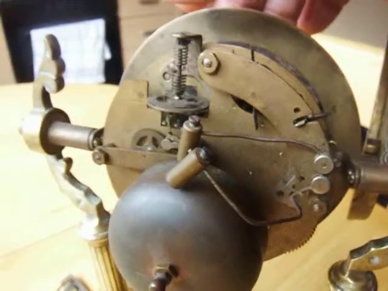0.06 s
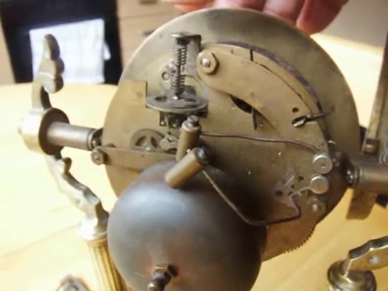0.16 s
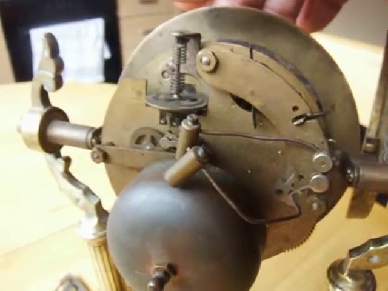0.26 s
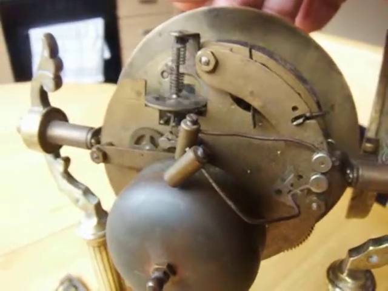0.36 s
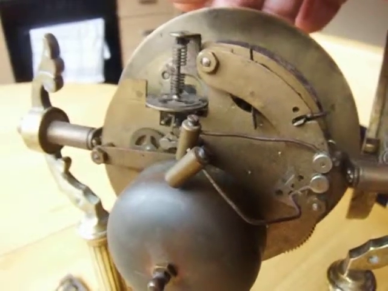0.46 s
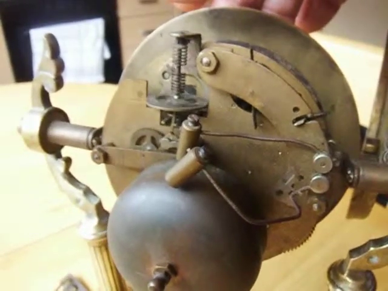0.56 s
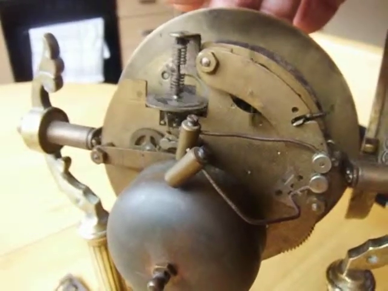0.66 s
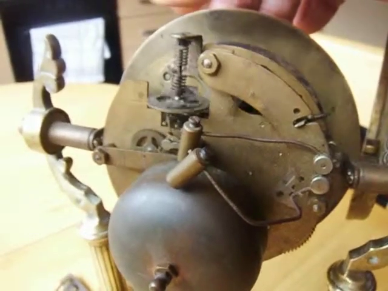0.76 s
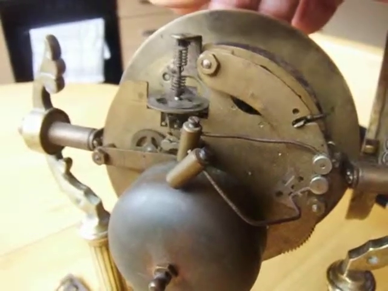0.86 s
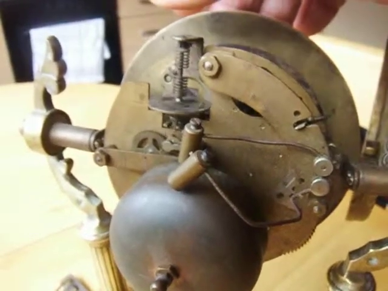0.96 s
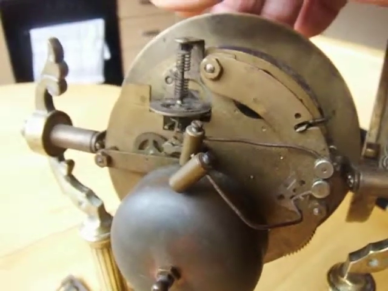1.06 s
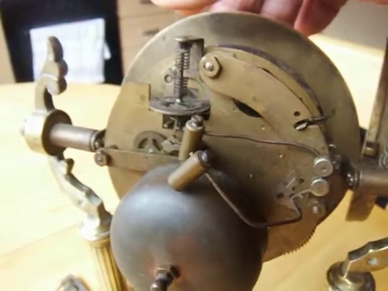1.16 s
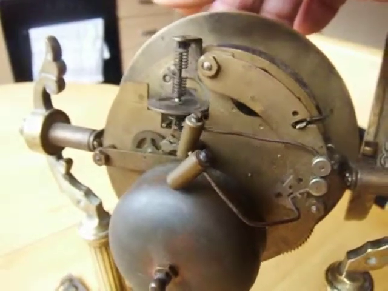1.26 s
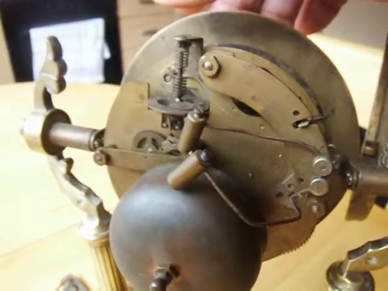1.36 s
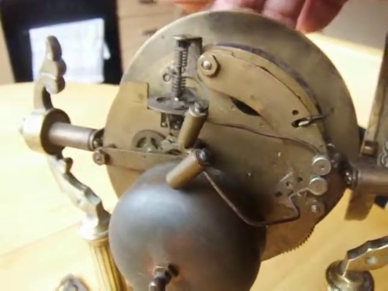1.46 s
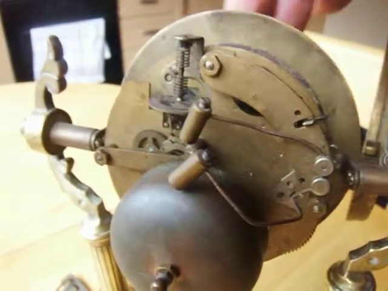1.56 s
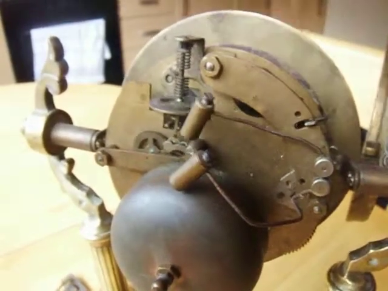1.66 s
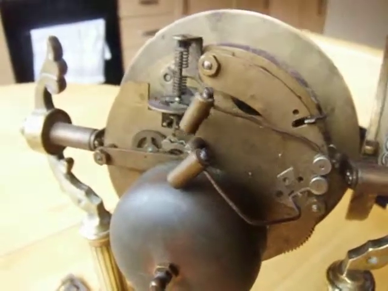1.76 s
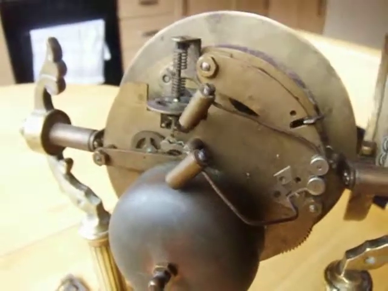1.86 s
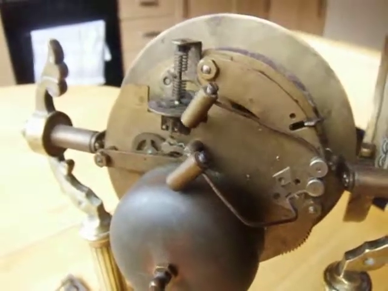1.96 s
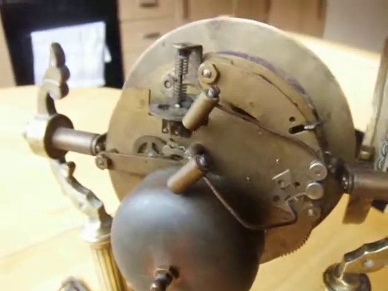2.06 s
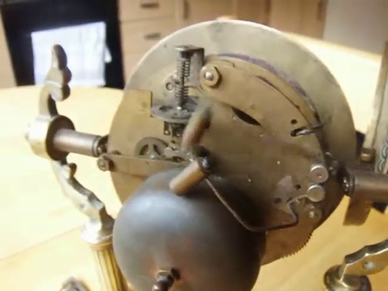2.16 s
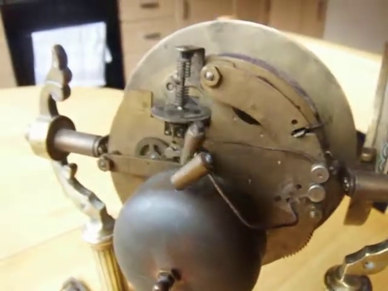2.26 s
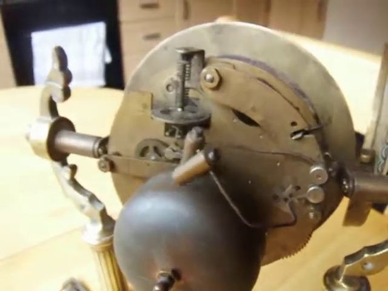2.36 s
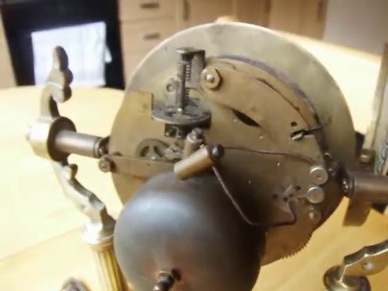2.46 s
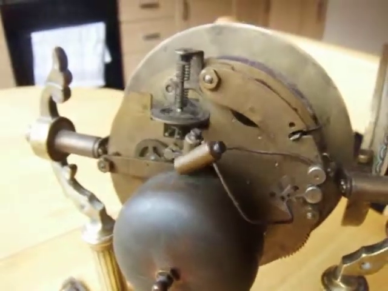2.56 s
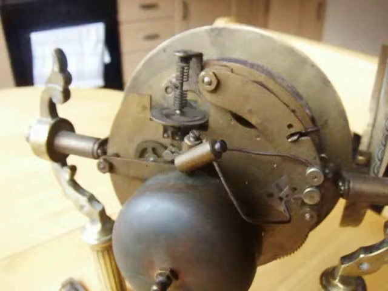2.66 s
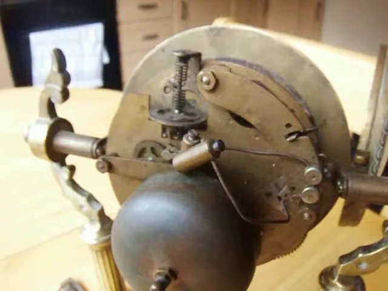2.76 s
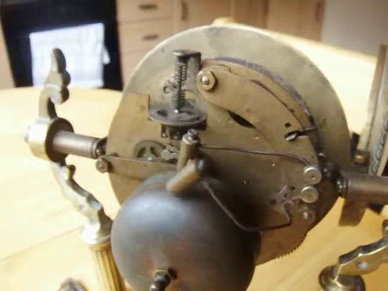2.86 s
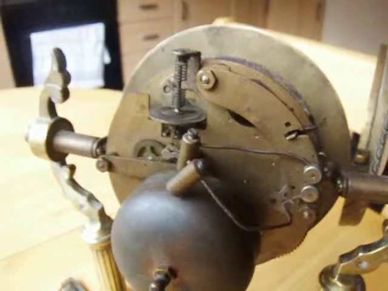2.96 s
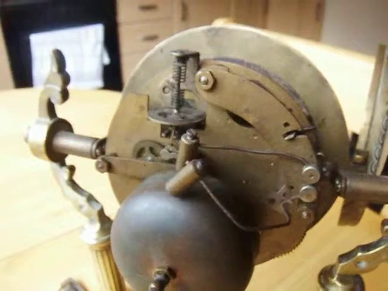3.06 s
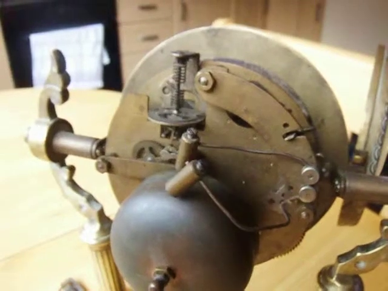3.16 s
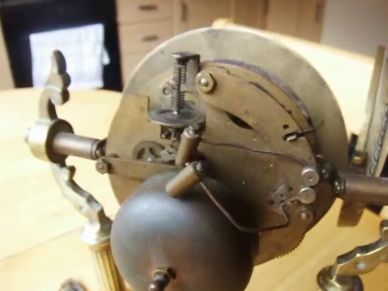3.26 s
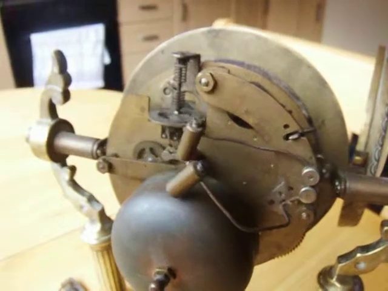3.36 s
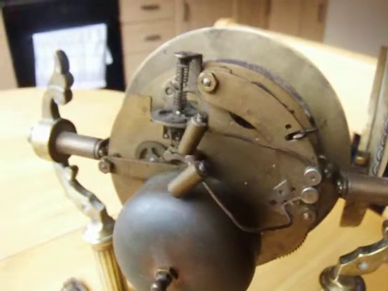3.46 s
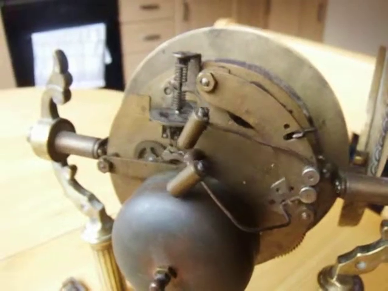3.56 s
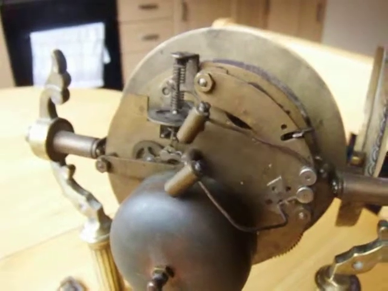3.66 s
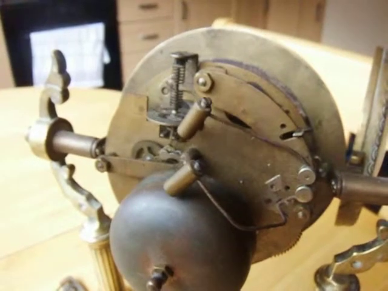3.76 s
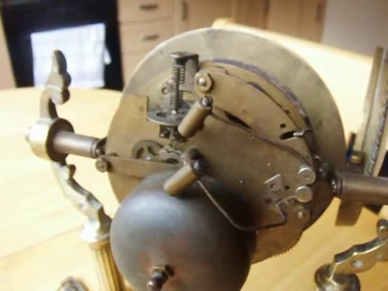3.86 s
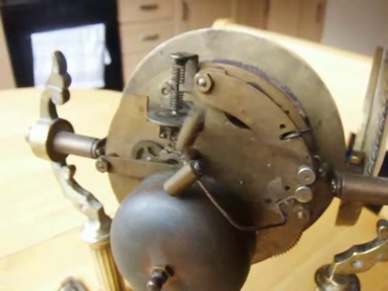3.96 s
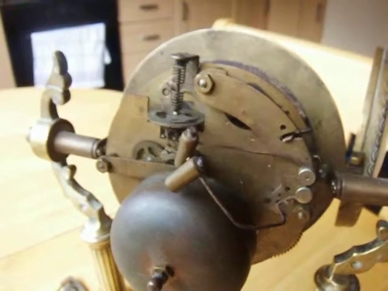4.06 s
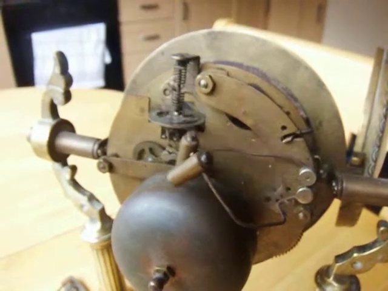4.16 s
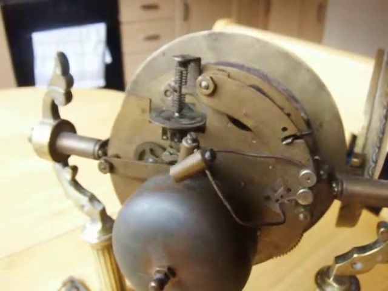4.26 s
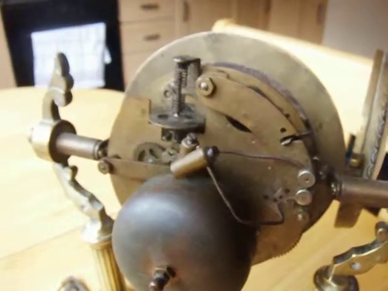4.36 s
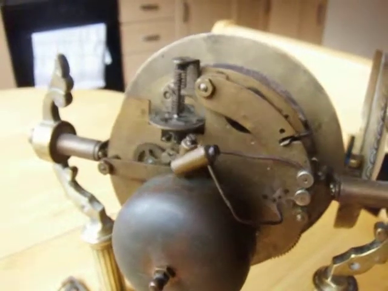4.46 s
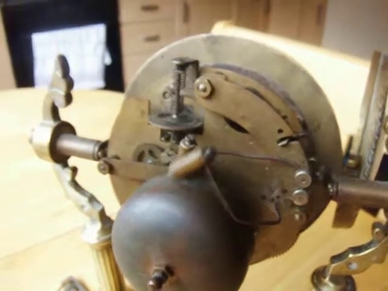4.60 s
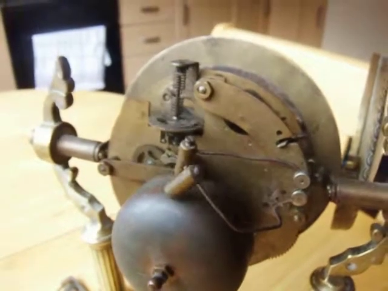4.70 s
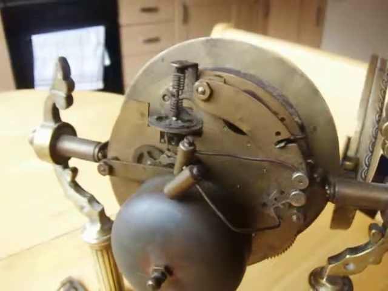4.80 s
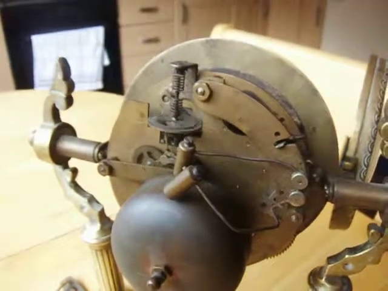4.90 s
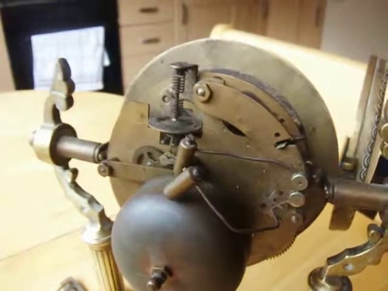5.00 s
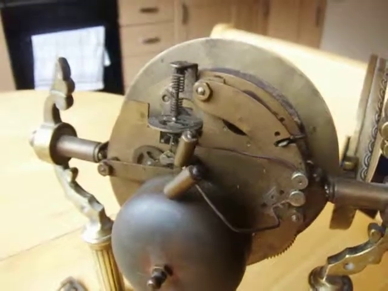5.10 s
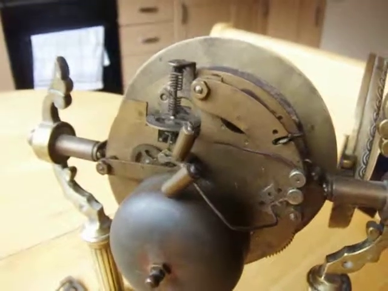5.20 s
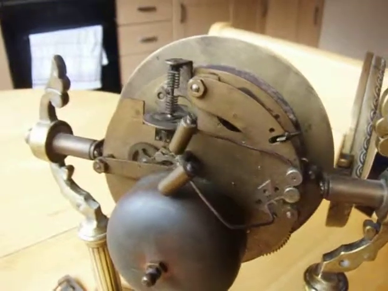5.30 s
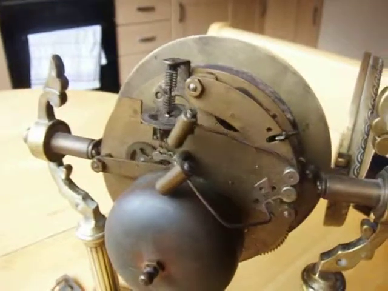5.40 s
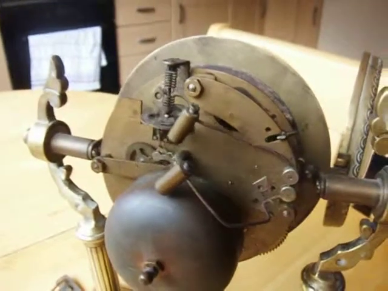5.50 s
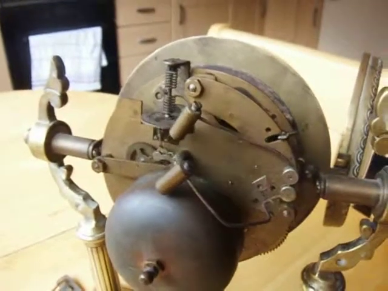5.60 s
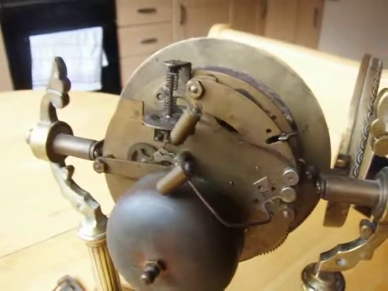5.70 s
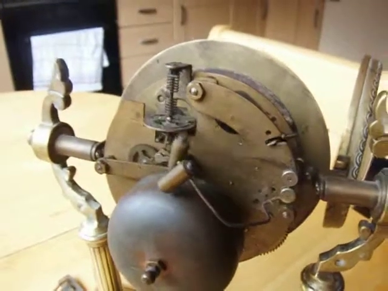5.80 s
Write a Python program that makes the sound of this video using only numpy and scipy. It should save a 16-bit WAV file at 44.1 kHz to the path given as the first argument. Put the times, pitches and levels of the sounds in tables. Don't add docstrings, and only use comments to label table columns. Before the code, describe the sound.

A small, lo-fi microphone sits close to a clock movement on an indoor table. At first there is soft low air murmur, faint hum and handling rumble. A light click comes at 0.3 s, then a loud metallic lever clack at 0.68 s with quick dwindling bounces. At 0.93 s the wheels start, sharp ticks quickening over about a second into a dry rattle of roughly 45 teeth per second, continuing to the end near 5.8 s. Heavy bell strokes land at 2.2, 4.0 and 5.76 s: a hard crack, table thud, fluttering hammer rebounds and a piercing ring near 4.2 kHz over softer tones around 1.6 kHz. Lighter, drier strokes on the smaller bell fall at 2.85 and 4.65 s, slightly higher. Rings overlap and beat. A small catch clicks at 3.39 s. Blows clip, the level steps down, then returns half a second later; treble is muffled and grainy.

```python
import sys
import numpy as np
from scipy import signal
from scipy.fft import rfft, irfft
from scipy.io import wavfile

SR = 44100
rng = np.random.default_rng(int(sys.argv[2]) if len(sys.argv) > 2 else 0)


def makeup_ratio(level_db):
    decades = np.asarray(level_db, float) / 20
    return 10 ** decades


def unload_audio(sound):
    columns = np.transpose(np.atleast_2d(sound))
    steps = np.round(np.clip(columns, -1, 1) * 32767)
    wavfile.write(sys.argv[1], SR, steps.astype(np.int16))


N = 257544
T = np.arange(N) / SR

OUTER_S, INNER_S = [2.20362, 4.00317, 5.76376], [2.84857, 4.64643]
# (low partials [dB], high partials [dB], knock [dB], extra for the last split twin [dB])
OUTER_BLOWS = [
    (3.5, 3, 7.4, 0),
    (5.5, 3.5, 14, 0),
    (8, 5.5, 12, 0),
]
START_S, TOP_PER_S = .93, 45.397


def evened(x):
    return x / np.sqrt(np.mean(x ** 2) + 1e-20)


def add(mix, s, sound):
    part = mix[round(s * SR):][:len(sound)]
    part += sound[:len(part)]


def curve(rows):
    return np.interp(T, *np.transpose(rows))


def since(s):
    return np.maximum(T - s, 0)


def shaped(points):
    f, db = np.transpose(points)
    hz = np.fft.rfftfreq(N, 1 / SR)
    spectrum_db = np.interp(np.log(hz + 1), np.log(f + 1), db)
    return evened(irfft(rfft(rng.standard_normal(N)) * makeup_ratio(spectrum_db), N))


def ring(modes, scatter_db, rise, crack_db, crack_t60):
    t = T[:8000]
    hz, db, t60 = np.transpose(modes)[:, :, None]
    level_luck, phase_luck = rng.standard_normal((2, len(modes), 1))
    decay = makeup_ratio(db + scatter_db * level_luck - 60 * t / t60)
    sound = (decay * np.sin(2 * np.pi * hz * t + phase_luck)).sum(0)
    thin_noise = np.diff(rng.standard_normal(len(t) + 1)) * 2
    sound += makeup_ratio(crack_db - 60 * t / crack_t60) * thin_noise
    sound *= 1 - np.exp(-t / rise)
    return sound / abs(sound).max()


def gain():
    step_s = [0, 2.2065, 2.8505, 3.3555, 4.006, 4.5335, 4.6475, 5.157, 5.7665]
    # (gain [dB], creep [dB/s])
    steps = [(2, -1.54), (-2.37, 4), (-9.5, -5.5), (0, -1.25), (-10.5, -4), (-1.7, -5), (-10.5, -5),
             (-0.94, 1), (-13.5, 7)]
    step = np.searchsorted(step_s, T, "right") - 1
    gain_db, creep = np.transpose(steps)[:, step]
    return makeup_ratio(gain_db + creep * (T - np.take(step_s, step)))


def duck():
    deepest_s, settle_db = 0.29, -5
    dips = [-18, -9, -26]
    duck_db = settle_db * np.minimum(since(OUTER_S[0]) / 0.22, 1)
    for s, db in zip(OUTER_S, dips):
        lapse = since(s) / deepest_s
        duck_db = duck_db + db * (lapse * np.exp(1 - lapse)) ** 2
    return duck_db


def appliance_hum():
    # (frequency [Hz], level [dB])
    tones = [(120, -65.5), (387.6, -68.5), (506, -72.5), (807.5, -71)]
    hum = np.zeros(N)
    for hz, db in tones:
        waver = .4 * shaped([(.3, 2.5), (4, -15), (9, -60.0)])
        hum += makeup_ratio(db + 5.0) * np.sin(2 * np.pi * hz * T + waver)
    return hum


def hand(duck_db):
    push_db, push_duck, surge_s = -54, 1.1, 0.065
    # (time [s], level above the steady push [dB])
    surges = [(.24, 5), (.67, 7), (1.3, 3.5), (1.48, 11), (1.639, 6.5), (1.81, 12), (2.048, 5), (2.2, 13.5),
              (2.839, 6.5), (3.348, 13), (3.6, 6.5), (4.01, 11.5), (4.52, 9), (4.85, 10.5), (5.161, 11.5),
              (5.758, 15)]
    surge_db = sum(db * np.exp(-((T - s) / surge_s) ** 2) for s, db in surges)
    rumble = shaped([(3, -3.5), (10, -6.5), (25, -10.5), (55, -10.5), (90, -33.5), (200, -48.0)])
    return makeup_ratio(push_db + push_duck * duck_db + surge_db) * rumble


def room():
    murmur_db = -50.5
    # (frequency [Hz], density [dB per Hz])
    air = [(35, -32.5), (60, -4.5), (135, -0.5), (276, -6), (513, -5.5), (553, -9.5), (620, -9.5),
           (2400, -22), (3500, -21.5), (5400, -35.5), (7020, -65), (11900, -120)]
    duck_db = duck()
    murmur = makeup_ratio(0.5) * shaped(air) + makeup_ratio(48) * appliance_hum()
    return makeup_ratio(murmur_db + duck_db) * murmur + hand(duck_db)


def table():
    # (frequency [Hz], lag [turns], level under the knock [dB], t60 [s])
    boards = [(421, 0.056, -28, 0.1), (461, 0.42, -26, 0.11)]
    # (frequency [Hz], density [dB per Hz])
    loose_parts = [(90, -3), (280, 2), (600, -5), (950, -4), (1500, -7), (3000, -2.5), (5400, -15)]
    thud_db, thud_t60 = -24, 0.1
    out, t, jolt = np.zeros(N), T[:12000], shaped(loose_parts)
    for s, (_, _, knock_db, _) in zip(OUTER_S, OUTER_BLOWS):
        bloom = sum(makeup_ratio(db - 60 * t / t60) * np.sin(2 * np.pi * (hz * t + lag)) for hz, lag, db, t60 in boards)
        thud = makeup_ratio(thud_db - 60 * t / thud_t60) * np.roll(jolt, round(s * SR))[:len(t)]
        add(out, s, makeup_ratio(knock_db) * (bloom + thud) * (1 - np.exp(-t / .003)))
    return out


def speed():
    start_per_s, spin_up_s = 17.0, .7005
    return TOP_PER_S - (TOP_PER_S - start_per_s) * np.exp(-since(START_S) / spin_up_s)


def rattle(modes, level_db, calm, spread):
    # (time [s], slip [teeth])
    slip = [(1.85, 0), (2, .13), (2.15, -.15), (2.65, -.24), (3.15, .44), (3.4, .42), (3.9, .1),
            (4.4, -.07), (4.65, -.57), (4.9, -.55), (5.15, -.14), (5.83, .22)]
    start_teeth = -.31
    teeth = np.cumsum(speed() * (T > START_S)) / SR + start_teeth + curve(slip) + .5
    tooth_db = 1.6 * rng.standard_normal(300)[np.clip(teeth, 0, 299).astype(int)]
    crowd = calm + np.exp(-((teeth % 1 - .5) / spread) ** 2)
    sizes = rng.standard_normal(N) * makeup_ratio(2.5 * np.minimum(rng.exponential(1, N), 4))
    struck = rng.random(N) < 3000 * crowd / SR
    taps = struck * sizes * np.sqrt(crowd) * makeup_ratio(tooth_db) + 0j
    taps += 0.83 * np.diff(np.floor(teeth + .5), prepend=0) * sizes
    rung = np.zeros(N)
    for k, (hz, width, db) in enumerate(modes):
        pole = np.exp((2j * np.pi * hz - np.pi * width) / SR)
        rung += (-1) ** k * makeup_ratio(db) * signal.lfilter([1], [1, -pole], taps).imag
    return evened(rung) * makeup_ratio(level_db) * (T > START_S)


def running_train():
    # (frequency [Hz], width [Hz], level [dB])
    fly = [(3823, 350, -7), (4410, 370, -1), (4716, 400, -5), (5524, 350, -3)]
    # (frequency [Hz], width [Hz], level [dB])
    wheels = [(276.4, 16, -30), (2046, 500, -3.5), (2600, 340, -1.5), (2866, 320, -1), (3630, 400, -5)]
    # (time [s], level [dB])
    play = [(.93, -2.5), (1.7, 0), (1.94, 0.5), (2.15, -0.5), (2.45, 1.5), (2.7, -2), (3, 2), (3.4, -0.5),
            (3.55, -1.5), (4, 2), (4.5, 0.5), (4.65, 0.5), (4.9, 1.5), (5.1, 2.5), (5.25, 0), (5.84, 1.5)]
    fly_db, fly_per_speed = -43, .8
    wheels_db, wheels_per_speed = -47, 2
    hush_s, hush_length_s, hush_db = 1.84, .085, -7
    shake_db, shake_s = 4.5, 0.32
    speed_db = 20 * np.log10(speed() / TOP_PER_S)
    loose_db = curve(play) + hush_db * ((T > hush_s) & (T < hush_s + hush_length_s))
    shaking_db = sum(shake_db * np.exp(-since(s) / shake_s) * (T > s) for s in OUTER_S)
    fly_level_db = fly_db + fly_per_speed * speed_db + loose_db
    wheels_level_db = wheels_db + wheels_per_speed * speed_db + 1.8 * loose_db + shaking_db
    out = rattle(fly, fly_level_db, calm=0.13, spread=0.28)
    return out + rattle(wheels, wheels_level_db, calm=0.36, spread=0.41)


def tooth_snaps():
    # (time [s], peak level [dB])
    landings = [(.9414, -34.5), (.9951, -25), (1.0555, -33.5), (1.0999, -28), (1.1403, -30.5),
                (1.1745, -33), (1.2516, -36), (1.3324, -33.5), (1.4531, -30.5), (1.488, -30.5),
                (1.514, -30), (1.5733, -31.5), (1.6034, -35.5), (1.6648, -25.5), (1.737, -35.5),
                (1.773, -29), (1.929, -38), (2.0522, -35.5), (2.2694, -33.5), (2.4074, -38),
                (2.6653, -35.5), (2.6898, -25.5), (2.7112, -25.5), (3.3737, -40), (5.1847, -42)]
    # (frequency [Hz], level [dB], t60 [s])
    tick = [(2720, -10.5, 0.0089), (3743, -4.5, .008), (4090, -1.5, 0.014), (5040, -0.5, .008),
            (5780, -10, 0.013)]
    out = np.zeros(N)
    for s, db in landings:
        add(out, s, makeup_ratio(db + 11.0) * ring(tick, 2.9, 0.000041, 1, .006))
    return out


def hammer_hops():
    # (frequency [Hz], level [dB], t60 [s])
    snap = [(2230, -12.5, 0.019), (2754, -2.5, 0.019), (3520, -2, 0.014), (4570, 9, 0.002),
            (4980, -6.5, 0.024), (5110, -0.5, 0.018)]
    first_hops_s, first_hops_db = [.057, .0553, .056], [-24.5, -25, -26]
    shrink, hops, loss_db, scatter_db = .87, 8, 0.3, 0.5
    k = np.arange(hops)
    out = np.zeros(N)
    for blow_s, first_s, first_db in zip(OUTER_S, first_hops_s, first_hops_db):
        hop_s = blow_s + np.cumsum(first_s * shrink ** k)
        hop_db = first_db + scatter_db * rng.standard_normal(hops) - loss_db * k
        for s, db in zip(hop_s, hop_db):
            add(out, s, makeup_ratio(db + 7) * ring(snap, 0.77, 0.00011, 2.5, 0.0089))
    return out


def lever():
    # (time [s], peak level [dB], share of the bright modes [0-1])
    bounces = [(0.325, -21, 0.86), (0.657, -26.5, 0.82), (0.6668, -25, 0.7), (0.6765, -5.5, 0.51),
               (0.6794, -18, 0.8), (.6875, -33, 0.8), (0.6911, -15.5, 0.1), (.7004, -23.5, 1),
               (0.702, -22, 1), (0.7241, -22.5, 0.3), (0.754, -25.5, 0.5), (0.769, -29.5, 1),
               (0.7859, -47, 0.7), (0.846, -39, 1)]
    # (frequency [Hz], level [dB], t60 [s])
    dull_modes = [(1930, -23, .2), (2100, 1, .013), (2568, -7, .018), (2783, -2, .013), (3300, -4, .009)]
    # (frequency [Hz], level [dB], t60 [s])
    bright_modes = [(3892, -18, .06), (4150, -1, .011), (4700, -3, .008), (5050, -6, .01), (5450, -2, .008)]
    # (frequency [Hz], level [dB], t60 [s])
    catch_modes = [(400, -3, 0.02), (646, -8, 0.04), (1060, -1, 0.018), (2160, -2, 0.018),
                   (2830, 7, 0.0091)]
    catch_s, catch_db = 3.3855, -24
    out = np.zeros(N)
    for s, db, share in bounces:
        dull = ring(dull_modes, 0.82, 0.0011, -7.5, 0.0084)
        bright = ring(bright_modes, 1.5, 0.00056, -7, 0.0063)
        add(out, s, makeup_ratio(db) * ((1 - share) * dull + share * bright))
    add(out, catch_s, makeup_ratio(catch_db) * ring(catch_modes, 1.1, 0.001, -22, 0.0072))
    return out


def bell(partials, rings, knock_hz, knock, times, blows, crack_db, crack_t60):
    out = np.zeros(N)
    for s, (low_db, high_db, knock_db, twin_db) in zip(times, blows):
        t = T[:N - round(s * SR)]
        for (hz, lag), (db, t60) in zip(partials, rings):
            db = db + (high_db if hz > 3000 else low_db) + twin_db * (hz == partials[-1][0])
            swell = 1 - np.exp(-t / .0045)
            add(out, s, makeup_ratio(db - 60 * t / t60) * np.sin(2 * np.pi * (hz * t + lag)) * swell)
        frame = ring(np.c_[knock_hz, knock], 0.55, 0.0011, crack_db, crack_t60)
        add(out, s - .0004, makeup_ratio(knock_db) * frame)
    return out


def inner_bell():
    # (frequency [Hz], lag [turns])
    partials = [(275, 0), (1615.75, 0), (3300, 0), (4352.1, -.05), (4342.6, -.3)]
    # (level [dB], t60 [s])
    rings = [(-45.5, 1.2), (-26, 5), (-44, 3.6), (-15.5, 2.4), (-24.5, 2.3)]
    knock_hz = [190, 800, 2050, 2767, 4860, 3700, 5400]
    # (level [dB], t60 [s])
    knock = [(-32, 0.092), (-32.5, 0.017), (-3.5, 0.03), (3.5, 0.029), (9.5, 0.0078), (-9, 0.012),
             (4.5, 0.012)]
    # (low partials [dB], high partials [dB], knock [dB], extra for the last split twin [dB])
    blows = [
        (0, -0.5, 5.93, -0.5),
        (0, -5, 6.3, 5),
    ]
    return bell(partials, rings, knock_hz, knock, INNER_S, blows, crack_db=1, crack_t60=0.01)


def outer_bell():
    # (frequency [Hz], lag [turns])
    partials = [(275, 0), (1582.6, 0), (1648.3, .35), (3463.1, .6), (4256.6, .45), (4247.0, 0), (4266.1, 0)]
    # (level [dB], t60 [s])
    rings = [(-48.5, 0.75), (-33.5, 4.5), (-28.5, 4.5), (-38, 1.3), (-11, 2.4), (-34, 3.3), (-45, 0.74)]
    knock_hz = [60, 150, 860, 1249, 1884, 2010, 2435, 2541, 2961, 3362, 3779, 4565, 5033, 5120]
    # (level [dB], t60 [s])
    knock = [(-9.5, 0.12), (-5.5, 0.012), (-25.5, 0.09), (-4, 0.062), (-11.5, 0.044), (-20, 0.18),
             (-25.5, 0.3), (-7, 0.063), (-3.5, 0.066), (-2, 0.12), (-5, 0.12), (-8, 0.081), (-15, 0.2),
             (0.5, 0.011)]
    return bell(partials, rings, knock_hz, knock, OUTER_S, OUTER_BLOWS, crack_db=4, crack_t60=0.062)


def scene():
    clicks = running_train() + tooth_snaps() + hammer_hops() + lever()
    tail = rng.standard_normal(9000) * makeup_ratio(-60 * T[:9000] / 0.32)
    wet = signal.fftconvolve(clicks, tail / np.linalg.norm(tail))[:N]
    bells = table() + inner_bell() + outer_bell()
    return (room() / gain() + clicks + makeup_ratio(-12) * wet + bells)[None]


def roll_off(x):
    return signal.sosfilt(signal.butter(12, 16660, fs=SR, output="sos"), x)


def record(dry):
    x = (dry[0] + 0.0004) * gain()
    full = np.sqrt(.5)
    slow = signal.resample_poly(x, 1, 4, window=("kaiser", 5.))
    levels = np.clip(np.floor(slow / full * 128), -128, 127) / 128
    edge = signal.firwin(101, 5450, window=("kaiser", 9), fs=SR)
    back = signal.resample_poly(levels, 4, 1, window=edge)[:N]
    return roll_off(full * np.clip(back, -1, 1)[None])


dry = scene()
out = record(dry)
unload_audio(out)
```